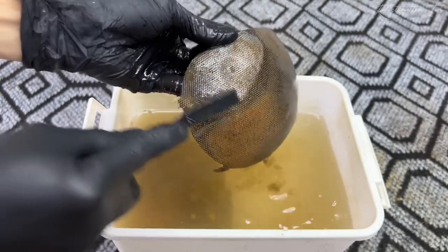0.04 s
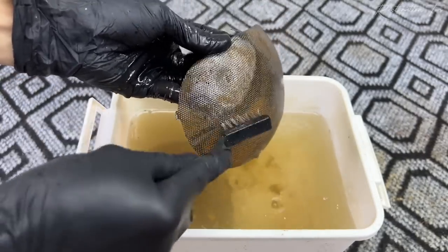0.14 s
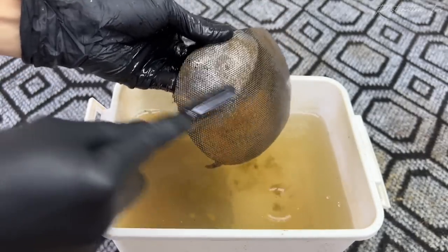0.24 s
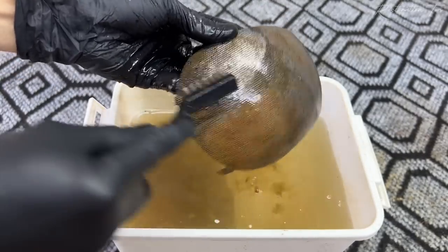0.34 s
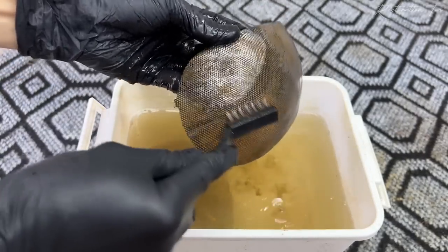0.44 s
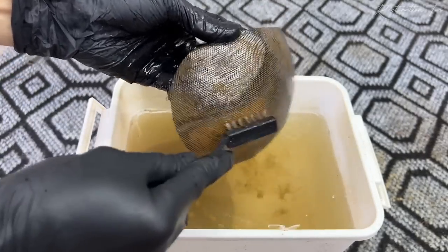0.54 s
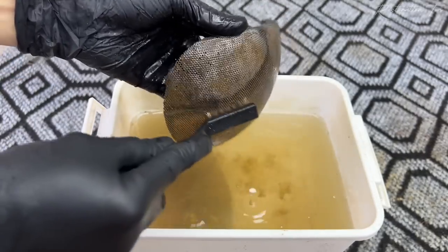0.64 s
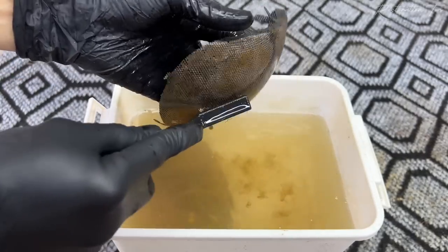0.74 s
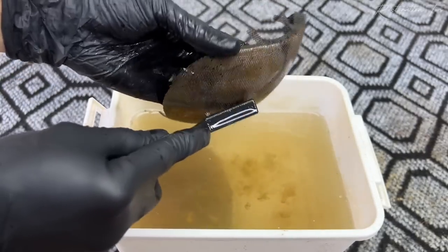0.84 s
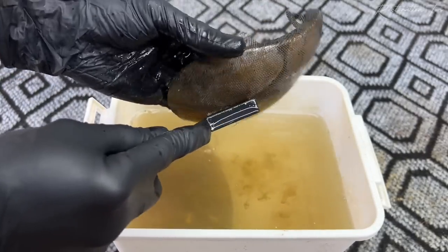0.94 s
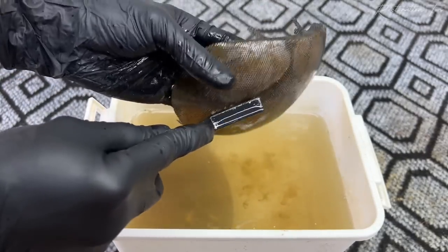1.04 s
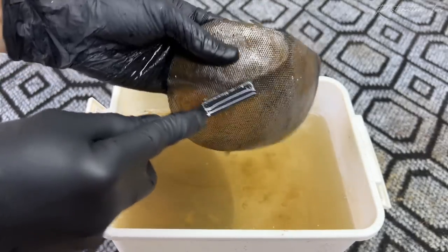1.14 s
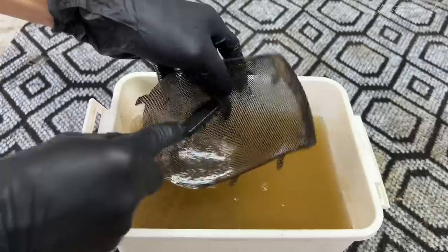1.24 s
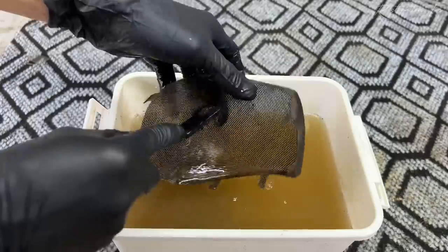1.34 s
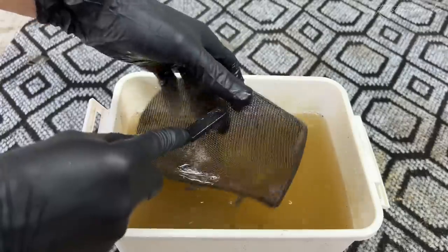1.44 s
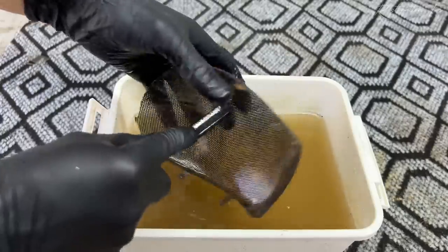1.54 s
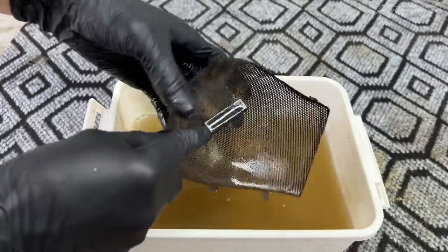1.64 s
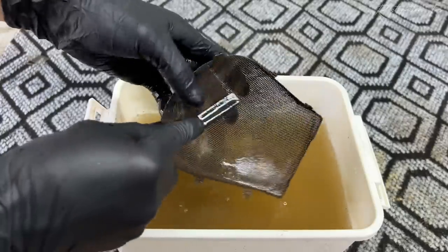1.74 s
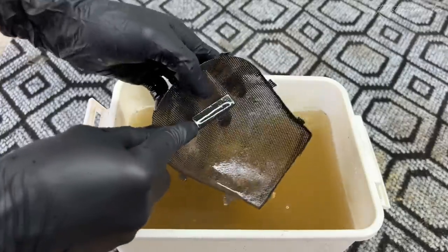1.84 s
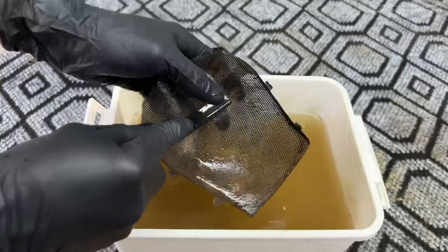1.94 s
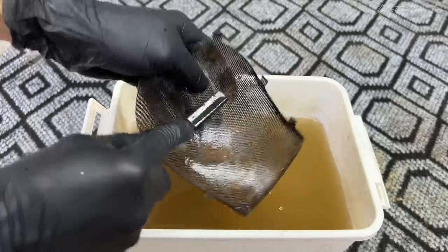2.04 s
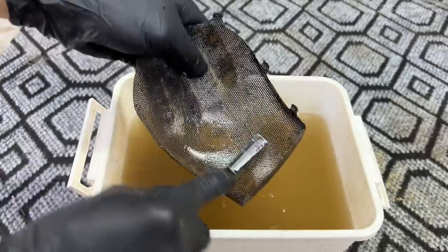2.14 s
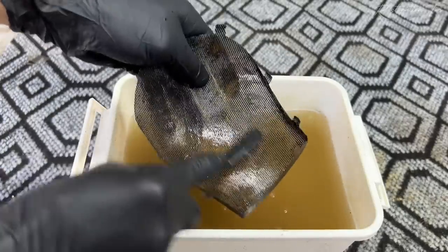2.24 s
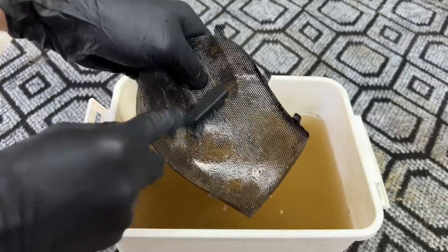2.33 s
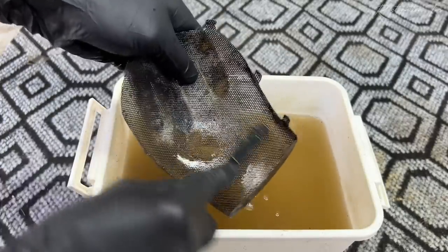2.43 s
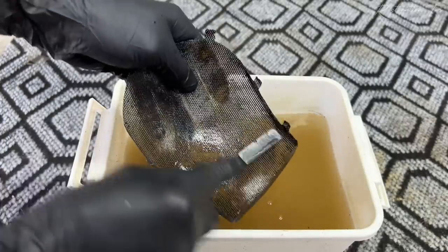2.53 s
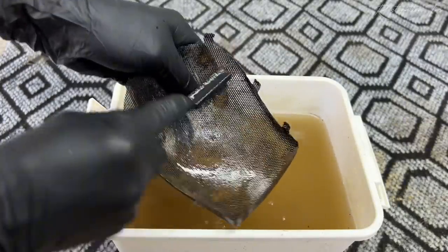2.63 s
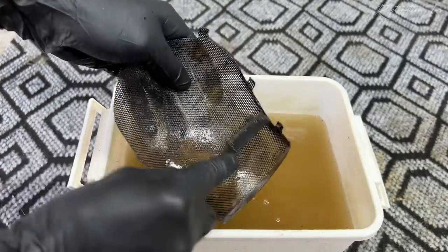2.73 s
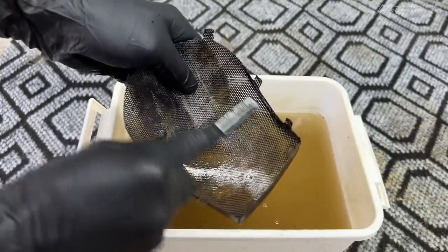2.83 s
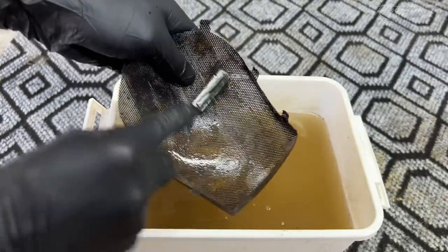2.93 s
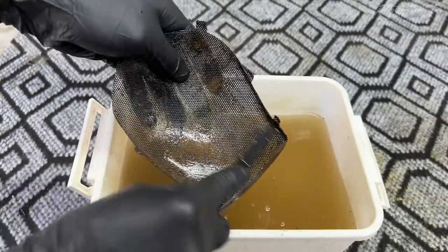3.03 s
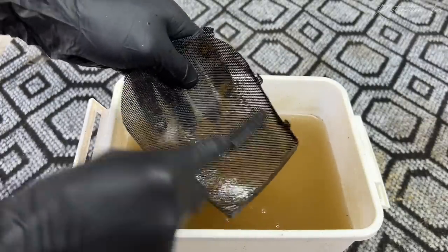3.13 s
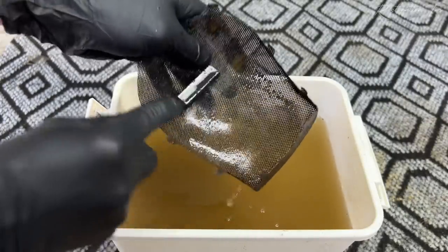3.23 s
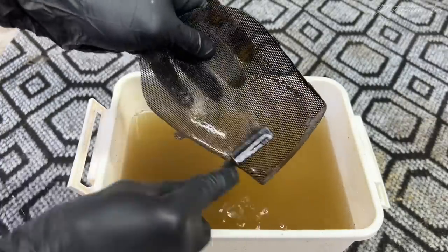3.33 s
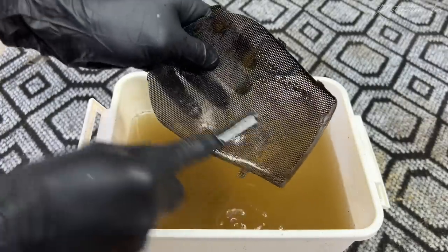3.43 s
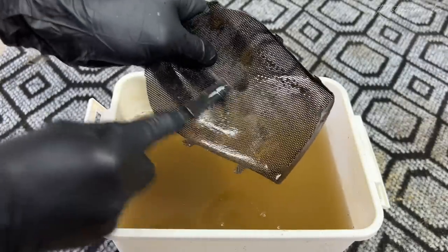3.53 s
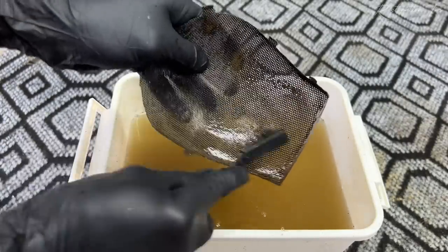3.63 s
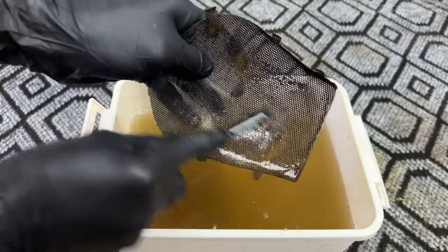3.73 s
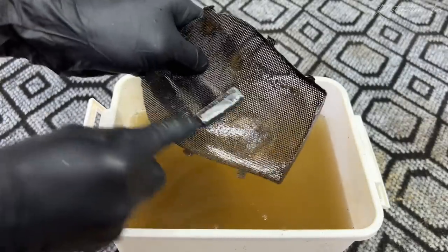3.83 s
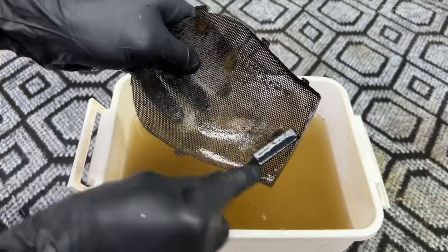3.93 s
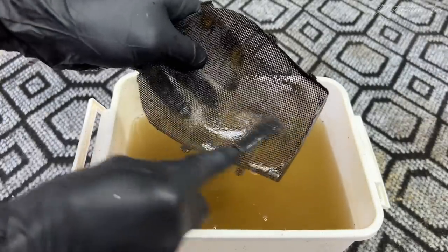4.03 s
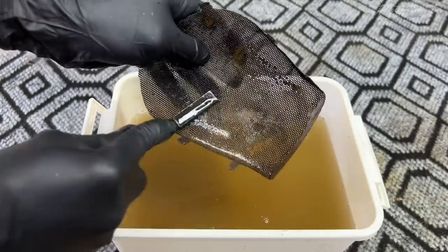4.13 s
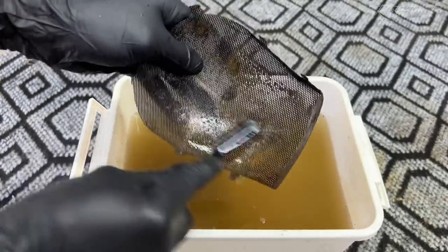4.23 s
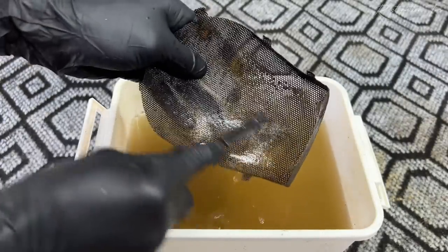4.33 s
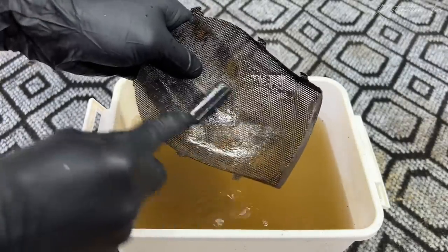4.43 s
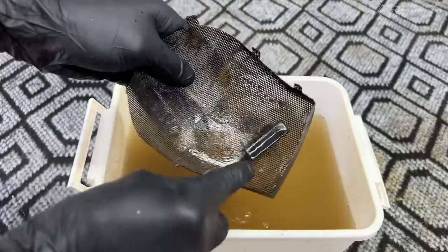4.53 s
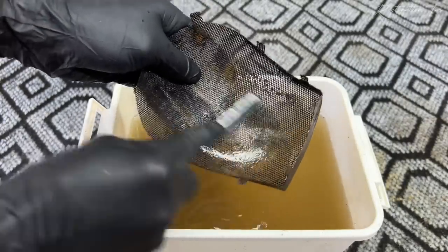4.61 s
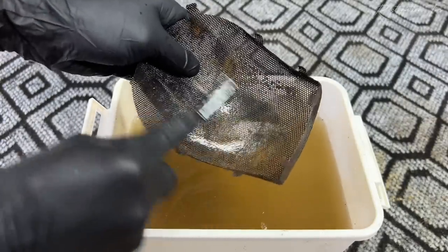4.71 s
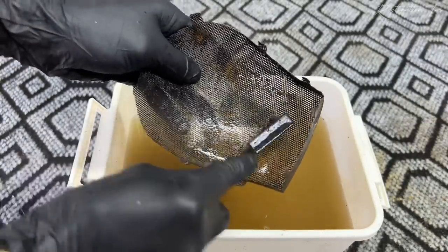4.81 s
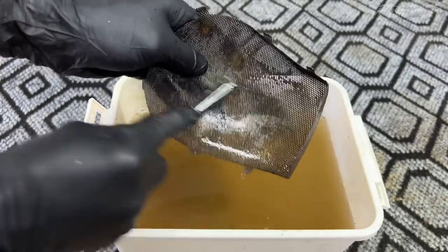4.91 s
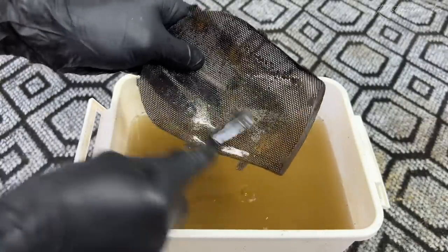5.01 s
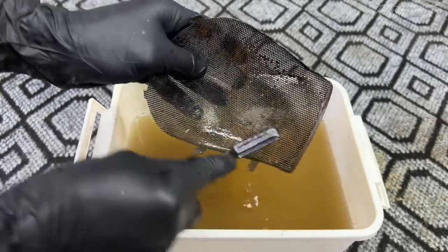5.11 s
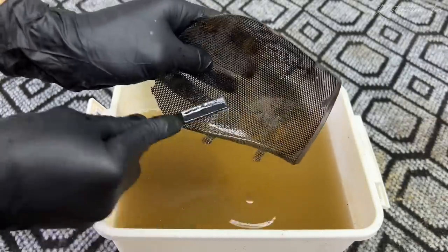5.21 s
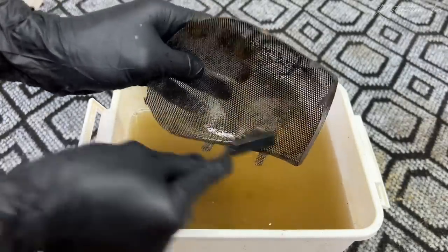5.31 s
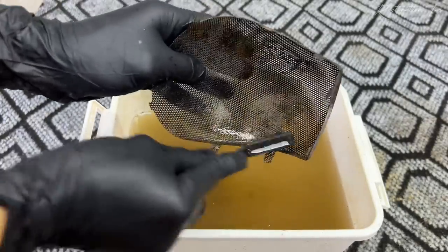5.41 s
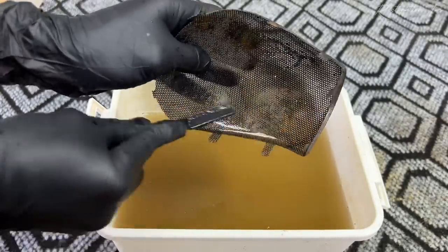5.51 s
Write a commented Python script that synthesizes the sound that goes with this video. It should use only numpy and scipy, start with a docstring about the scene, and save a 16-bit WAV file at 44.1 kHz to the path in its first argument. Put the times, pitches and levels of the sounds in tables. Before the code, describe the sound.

Rapid back-and-forth bristle scrubbing on rusty wire mesh, hissy and metallic, with a quieter fumbling stretch, a few knocks and low room rumble.

```python
"""Scrubbing a rusty grille

A stiff brush scrubs a wet, rusty wire grille over a plastic tub: seven to eight strokes a second, softer for a while.
Random bristle flicks make a bright hiss and ring the mesh, deeper where it flexes freely; coarser grains make a wet rasp.
Noise bursts knock and fading tones clink on the grille, and filtered flicks are the water settling in the tub.
Wavering low tones hum and filtered noise rumbles underneath; the level dips once, briefly.
"""
import sys
import numpy as np
from scipy import signal
from scipy.fft import rfft, irfft
from scipy.io import wavfile

SR = 44100
rng = np.random.default_rng(int(sys.argv[2]) if len(sys.argv) > 2 else 0)


def store_wav(level_fs):
    """Save 16-bit WAV to argv[1]."""
    pcm = np.round(np.clip(np.atleast_2d(level_fs), -1, 1) * 32767)
    wavfile.write(sys.argv[1], SR, pcm.T.astype(np.int16))


N = 245195
TIME = np.arange(N) / SR
FREQ = np.fft.rfftfreq(N, 1 / SR)

# dull room noise, its level over time: (time [s], level [dB])
RUMBLE_LEVEL = [(0, -47), (1.1, -44.5), (1.8, -42.5), (3.7, -42), (4.3, -40), (5.56, -41)]
# and its colour before levelling: (frequency [Hz], gain [dB])
RUMBLE_COLOUR = [(20, -2.5), (33, -4), (52, 5), (70, 4.5), (110, 3.5), (165, -7.5), (205, -5.5),
                 (240, -10.5), (300, -8.5), (400, -18.5), (650, -22), (1200, -26.5), (3000, -34.5),
                 (15000, -32)]

# swells of the deep hum tone above its resting level: (time [s], time to fall to 1/e [s], level [dB])
HUM_SWELLS = [(0.0, 0.51, -49), (2.9, 0.4, -37), (4.55, 0.88, -44.5)]
# level of the hum tone above it: (time [s], level [dB])
UPPER_HUM_LEVEL = [(0, -61.5), (4.0, -68), (4.6, -41.5), (5.56, -45.5)]
# steady hum tones: (frequency [Hz], level [dB])
STEADY_TONES = [(53.8, -69.5), (150.3, -52), (201, -60), (473, -67)]
HUM_HZ, UPPER_HZ, HUM_REST_DB = 75.3, 107.6, -50.5

# stirred water settling in the tub: (time [s], level [dB])
WATER_LEVEL = [(0, -39.5), (.2, -50), (.55, -47.5), (.8, -54), (1.2, -51.5), (1.4, -74)]
# its colour before levelling: (frequency [Hz], gain [dB])
WATER_COLOUR = [(150, -14), (260, -1), (330, -10.5), (430, -8.5), (700, -14.5), (1200, -20), (2100, -23.5),
                (3500, -33)]

# blows that ring the rim: (time [s], level [dB], pitch struck [Hz], spread of the blow [octaves])
CLINKS = [(1.261, -41, 1244, .2), (1.264, -47, 4180, 0.44), (2.688, -40, 2350, 0.067),
          (3.915, -31, 1990, 0.15)]
# ringing modes of the rim: (frequency [Hz], gain [dB], time to fade by 60 dB [s])
RIM_MODES = [(1244, 0, 0.097), (1280, -8, .07), (1813, -0.5, 0.09), (2096, -1, 0.07), (2350, 0.5, 0.13),
             (2654, -14, 0.082), (3650, -4, .07), (3600, 3, 0.1), (4440, -1, 0.28), (5200, 15, 0.055)]
# brush knocks, scuffs or catches: (time [s], level [dB], added treble [dB], time to fade by 60 dB [s])
KNOCKS = [(.787, -34.5, 11, 0.0075), (1.042, -29, 2, 0.0066), (1.164, -31.5, -4, 0.063),
          (1.262, -30.5, -8, 0.088), (1.461, -35.5, -3, 0.12), (1.595, -47, 16, 0.051),
          (3.243, -25, -2, 0.13), (3.399, -27.5, -8, 0.16), (3.699, -33, 9, 0.11), (3.713, -21, -2, 0.014),
          (3.741, -11.5, 1, 0.0062), (3.915, -10, -27, 0.019), (4.709, -31, 1, 0.058),
          (5.414, -35, 0, 0.098)]

# one row a stroke: (time of fastest motion [s], length [s], effort before layer gains [dB],
# mesh drive [dB], wet rasp before its gain [dB], where it ends [0 at the fingers to 1 at the free edge])
STROKES = [(0.0, 0.068, -34.5, -4, -32.5, 0.25), (.104, 0.12, -31.5, 2, -28, 0.11),
           (.244, 0.082, -32, 4, -26, 0.23), (.324, 0.06, -37.5, -7, -26, 0.27),
           (.429, 0.15, -31.5, 3, -30.5, 0.13), (.56, 0.11, -46.5, 4, -33, 0.22),
           (.648, 0.098, -43.5, 2, -33, 0.29), (.728, 0.067, -46.5, 6, -30, 0.023),
           (.865, 0.09, -45.5, 6.5, -36, 0.072), (.93, 0.051, -47.5, 4, -31, 0.33),
           (1.11, 0.12, -48, 6, -30, 0), (1.198, 0.1, -36.5, 1, -30.5, 0.31),
           (1.403, 0.033, -48, 2, -30, 0.12), (1.496, 0.037, -44.5, -5, -38, 0.4),
           (1.618, 0.12, -42.5, 1, -33.5, 0.2), (1.728, 0.064, -43, 0.5, -36, 0.18),
           (1.828, 0.095, -46, 4.5, -39, 0.26), (1.943, 0.03, -45.5, 5.5, -30, 0),
           (2.098, 0.091, -30, 0, -30, 1), (2.262, 0.12, -31.5, 0.5, -32, 0.069),
           (2.412, 0.095, -27.5, 3, -32.5, 0.86), (2.543, 0.096, -31, -5.5, -28, 0.75),
           (2.686, 0.081, -30.5, -2.5, -27.5, 0.94), (2.834, 0.075, -32.5, -6.5, -32.5, 0.34),
           (2.984, 0.11, -27.5, -1, -33, .85), (3.139, 0.11, -31, .5, -31, 0.059),
           (3.279, 0.09, -29, 4.4, -32, 0.63), (3.435, 0.071, -28, 0.5, -30.5, 0.052),
           (3.568, .103, -27, 2.5, -31.5, 0.73), (3.733, 0.077, -28.5, 4.5, -33.5, 0.15),
           (3.865, 0.098, -27.5, 2.6, -31, 0.86), (4.07, 0.12, -29, -0.5, -32, 0),
           (4.203, 0.095, -29.5, -1, -35, 0.57), (4.343, 0.078, -29, 3, -33, 0.058),
           (4.47, 0.087, -27, 1, -35, 0.93), (4.61, 0.082, -28.5, 1.5, -33.5, 0.089),
           (4.737, 0.072, -27, 2, -33.5, 0.83), (4.883, 0.096, -29, 4, -30, 0.04),
           (5.005, .091, -26.5, -1, -34.5, 0.82), (5.156, 0.091, -27.5, -4.5, -29.5, .1),
           (5.286, 0.09, -29.5, -2, -28, 0.73), (5.46, 0.1, -29.5, -2, -29.5, 0.76),
           (5.575, 0.096, -32, -11, -27, 0.96)]
# wet scraping: (frequency [Hz], gain [dB])
RASP_COLOUR = [(100, -20), (300, 5), (470, 14), (650, 7), (900, 15.5), (1300, 16.5), (1650, 8),
               (2200, 12.5), (2900, 6.5), (4000, -15), (8000, -17)]
# bristle tips snapping off the wires: (frequency [Hz], gain [dB])
HISS_COLOUR = [(500, -22), (2500, -16), (4300, -14.5), (5200, -0.5), (6500, 4), (8300, 4), (10200, -7.5),
               (12000, 4), (14000, -3), (15700, 1.5)]
# ringing modes of the freely flexing mesh: (frequency [Hz], width [Hz], gain before the mesh level [dB])
MESH_MODES = [(3405, 93, 12.5), (3669, 46, 20.5), (3870, 124, 7), (4139, 38, 19.5), (4420, 16, 12),
              (4730, 20, 21.5), (5020, 65, 15.5), (5160, 24, 15), (5333, 52, 16), (5600, 39, 16.5),
              (5763, 65, 12.5), (6090, 30, 16.5), (6440, 94, 4), (6860, 83, 12.5), (7030, 114, 6),
              (7250, 590, 1.5), (7960, 50, -26)]
# how much a mode depends on the flexing: (frequency [Hz], share [0-1])
FLEX_SHARE = [(4200, 1), (4800, 0.54), (5100, 0.52), (5600, 0.21)]
# middle pitch of the patch of mesh under the brush, mostly lower as it gives more: (flex [dB], frequency [Hz])
PATCH_PITCH = [(-27, 6180), (-16, 5440), (-11.5, 4960), (-4.5, 5040), (-4.5, 3970)]
# drive of the mesh's low modes at the fingers, and what it gains out to the free edge
HELD_DB, GIVE_DB = -27, 27
# between strokes the bristles keep dragging, this far below the strokes around them
DRAG_DB = -13

# likeness of direct sound at the two microphone ports: (frequency [Hz], shared power [0-1])
PORT_LIKENESS = [(30, .92), (65, .75), (130, .93), (300, .6), (600, .3), (1200, .74), (2300, .72),
                 (3500, .62), (5000, .48), (6800, .4), (8300, .74), (15000, .85)]
# how far the left port leads: (frequency [Hz], phase [radians])
LEFT_LEAD = [(1200, 0), (3300, 1.1), (4200, .9), (5400, -.5), (6300, .3), (7600, .8), (8700, -.2),
             (10200, -3.14), (12050, -6.28), (13750, -9.42), (15500, -12.56)]
# how much louder the left port is: (frequency [Hz], left minus right [dB])
LEFT_TILT = [(30, 1.4), (65, 3.8), (130, 1.8), (300, 2.8), (1200, 2.7), (3000, 1), (4600, 4.8), (6600, 7.2),
             (7600, 3.2), (8600, 0), (15000, 0)]
EDGE_HZ = 15800


def amp(db):
    """Decibels to gain."""
    return 10 ** (np.asarray(db) / 20)


def unit(x):
    """Scales to an rms level of 1."""
    return x / np.sqrt(np.mean(x ** 2) + 1e-20)


def curve(rows):
    """Joins a table's points into a value at every sample."""
    return np.interp(TIME, *np.transpose(rows))


def by_stroke(column):
    """Glides from each stroke's value to the next, for one column of the stroke table."""
    return np.interp(TIME, [row[0] for row in STROKES], [row[column] for row in STROKES])


def read(points, hz=FREQ):
    """Reads a table along a log-frequency axis."""
    table_hz, value = np.transpose(points)
    return np.interp(np.log(hz + 1), np.log(table_hz + 1), value)


def colour(x, points):
    """Filters by a table of dB over frequency."""
    return irfft(rfft(x) * amp(read(points)), N)


def wander(hz):
    """Slow random movement of rms 1, up to about the given rate."""
    spectrum = rfft(rng.standard_normal(N))
    return unit(irfft(spectrum / (1 + (FREQ / hz) ** 4), N))


def resonate(x, hz, width):
    """Rings one mode, fixed or gliding, with a gain of about 1 at its peak."""
    r = np.exp(-np.pi * width / SR)
    if np.ndim(hz) == 0:
        pole = r * np.exp(2j * np.pi * hz / SR)
        return 2 * signal.lfilter([1 - r], [1, -pole], x).real
    # a gliding mode: shift its pitch down to zero, smooth, and shift back
    turn = np.exp(2j * np.pi * np.cumsum(hz) / SR)
    return 2 * (turn * signal.lfilter([1 - r], [1, -r], x / turn)).real


def add(mix, s, sound):
    """Lays a sound into the mix at a time in seconds."""
    part = mix[max(round(s * SR), 0):][:len(sound)]
    part += sound[:len(part)]


def flicks(per_s, spread_db, clump_db, clump_hz):
    """Single slips at random moments and of random size; slow clumping makes many louder together."""
    size = amp(spread_db * np.minimum(rng.exponential(1, N), 5)) * rng.standard_normal(N)
    happens = rng.random(N) < per_s / SR
    clumps = amp(clump_db * wander(clump_hz))
    return unit(size * happens * clumps)


def ports(direct, diffuse):
    """Direct sound reaches the two ports with a phase shift; diffuse sound is unrelated between them."""
    side = np.array([[.5], [-.5]])
    same = np.clip(read(PORT_LIKENESS), 0, 1)
    shared = np.sqrt(same) * rfft(direct) * np.exp(1j * side * read(LEFT_LEAD))
    unrelated = np.sqrt(1 - same) * rfft(diffuse)
    return irfft((shared + unrelated) * amp(side * read(LEFT_TILT)), N)


def rumble():
    """Dull room noise under everything."""
    noise = unit(colour(rng.standard_normal((3, N)), RUMBLE_COLOUR)) * amp(curve(RUMBLE_LEVEL))
    return ports(noise[0], noise[1:])


def hum(waver=0.13, lead=0.5):
    """Low tones, two of them swelling and fading, waver in phase and lead on the left (both in radians)."""
    swells = amp(HUM_REST_DB)
    for s, width, db in HUM_SWELLS:
        swells = swells + amp(db) * np.exp(-((TIME - s) / width) ** 2)
    tones = [(HUM_HZ, swells), (UPPER_HZ, amp(curve(UPPER_HUM_LEVEL)))]
    tones += [(hz, amp(db)) for hz, db in STEADY_TONES]
    shift = lead * np.array([[.5], [-.5]])
    total = np.zeros((2, N))
    for hz, gain in tones:
        # higher tones waver more, in step with their pitch
        drift = waver * hz / HUM_HZ * wander(6.8)
        phase = 2 * np.pi * (hz * TIME + rng.random()) + shift + drift
        total += np.sqrt(2) * gain * np.sin(phase)
    return total * amp([[1.6], [-1.6]])  # louder on the left


def tub(x, t60, size=2048):
    """Short reflections off the tub and water, different at each port and changing every 46 ms."""
    out = np.zeros((2, N + 4 * size))
    fade = signal.windows.cosine(2 * size)
    x = np.pad(x, (size, 2 * size))
    # fading random echoes that begin after 1 ms
    decay = amp(-60 * TIME[:size] / t60) * (TIME[:size] > .001)
    for start in range(0, N + size, size):
        taps = rng.standard_normal((2, size)) * decay / np.linalg.norm(decay)
        piece = x[start:start + 2 * size] * fade
        echo = signal.fftconvolve(piece[None], taps, axes=1)
        out[:, start:start + echo.shape[1]] += echo
    return out[:, size:size + N]


def slosh():
    """Small wavelets and drips lap in the tub: many random flicks, coloured and fading."""
    laps = flicks(per_s=1500, spread_db=0.5, clump_db=0.5, clump_hz=30)
    return unit(colour(laps, WATER_COLOUR)) * amp(curve(WATER_LEVEL))


def clinks(size=12000):
    """A blow on the rim rings the modes near the struck pitch."""
    out, t = np.zeros(N), TIME[:size]
    for s, db, struck_hz, octaves in CLINKS:
        for hz, mode_db, t60 in RIM_MODES:
            share = np.exp(-(np.log2(hz / struck_hz) / octaves) ** 2)
            fading = amp(db + mode_db - 60 * t / t60)
            add(out, s, share * fading * np.sin(2 * np.pi * hz * t))
    return out


def knocks(size=4096):
    """Dry ticks and scuffs of the brush against the wires: fading noise, each with its own brightness."""
    out = np.zeros(N)
    for s, db, bright_db, t60 in KNOCKS:
        tick = np.zeros(N)
        add(tick, s, rng.standard_normal(size) * amp(db - 60 * TIME[:size] / t60))
        out += colour(tick, [(200, -48), (900, -5.5), (2000, -9), (10000, bright_db - 5.5)])
    return out


def flexing():
    """The brush swings between turning points; the mesh gives more the farther it is from the fingers (dB)."""
    s, length, *_, end = np.transpose(STROKES)
    starts, stops = s - length / 2, s + length / 2
    # the brush turns midway between one stroke's stop and the next one's start
    turns = np.append((stops[:-1] + starts[1:]) / 2, stops[-1])
    index = np.arange(len(s))
    done, part = np.divmod(np.interp(TIME, turns, index), 1)
    smooth_part = (1 - np.cos(np.pi * part)) / 2
    place = np.interp(done + smooth_part, index, end)
    return HELD_DB + GIVE_DB * place


def effort(bite=3.96, release=3.1, unsteady_db=0.97):
    """Each stroke bites quickly and eases off; the bristles keep dragging at the turns."""
    power = amp(by_stroke(2) + DRAG_DB) ** 2
    for s, length, db, *_ in STROKES:
        away = np.minimum(2 * abs(TIME - s) / length, 3)
        steepness = np.where(TIME < s, bite, release)
        power = power + amp(db) ** 2 * np.exp(-2 * away ** steepness)
    return np.sqrt(power) * amp(unsteady_db * wander(45))


def rasp(force, flex_db, rasp_db=-2.0, growth=0.71, softening=0.15):
    """Wet rust crackles coarsely, grows more slowly than the stroke and softens where the mesh gives."""
    grains = flicks(per_s=4000, spread_db=1.8, clump_db=1.64, clump_hz=111)
    wet_db = by_stroke(4) - softening * flex_db
    return amp(rasp_db) * colour(grains * force ** growth * amp(wet_db), RASP_COLOUR)


def mesh_ring(ringing, flex_db):
    """The whole mesh rings in many modes; the low ones speak only where it flexes."""
    mesh = np.zeros(N)
    for k, (hz, width, db) in enumerate(MESH_MODES):
        mode_drive = ringing * amp(db + read(FLEX_SHARE, hz) * flex_db)
        mesh += (-1) ** k * resonate(mode_drive, hz, width)  # neighbours have opposite sign
    return mesh


def patch_ring(ringing, flex_db, pass_width=1040, overtone=1.4, overtone_db=-6.0, stray=0.096):
    """The patch under the brush has two resonances that glide as it travels (width of each pass in Hz)."""
    patch_hz = np.interp(flex_db, *np.transpose(PATCH_PITCH)) * (1 + stray * wander(8.6))
    patch = np.zeros(N)
    for hz, db in [(patch_hz, 0), (overtone * patch_hz, overtone_db)]:
        once = resonate(ringing, hz, pass_width)
        patch += amp(db) * resonate(once, hz, pass_width)
    return patch


def scrub(force, flex_db, hiss_db=0.87, mesh_db=-2.0, patch_db=3.5):
    """Bristle flicks hiss and set the mesh ringing."""
    drive = force * flicks(per_s=16000, spread_db=-0.3, clump_db=1.5, clump_hz=237)
    ringing = drive * amp(by_stroke(3))
    hiss = amp(hiss_db) * colour(drive, HISS_COLOUR)
    mesh = amp(mesh_db) * mesh_ring(ringing, flex_db)
    patch = amp(patch_db) * patch_ring(ringing, flex_db)
    return hiss + mesh + patch


def dip():
    """The level dips briefly: points of time [s] and gain."""
    return curve([(1.236, 1), (1.241, .12), (1.247, .2), (1.262, 1)])


def scene():
    """Brush and grille over the tub, in a humming room."""
    background = rumble() + hum()
    flex_db = flexing()
    force = effort()
    work = slosh() + clinks() + knocks() + rasp(force, flex_db) + scrub(force, flex_db)
    return (background + ports(work, tub(work, t60=0.042))) * dip()


def record(dry):
    """The recorder's band limit: a steep filter takes away the highest treble."""
    lowpass = signal.firwin(801, EDGE_HZ, window=("kaiser", 9), fs=SR)
    return signal.oaconvolve(dry, lowpass[None], "same")


dry = scene()
out = record(dry)
store_wav(out)
```